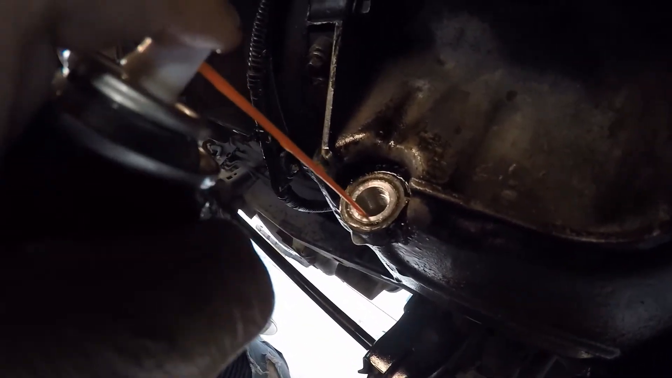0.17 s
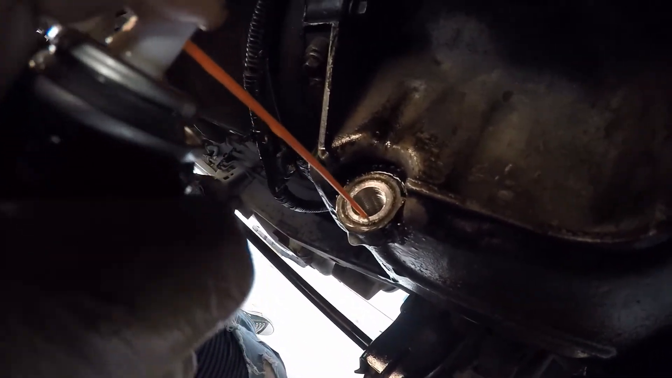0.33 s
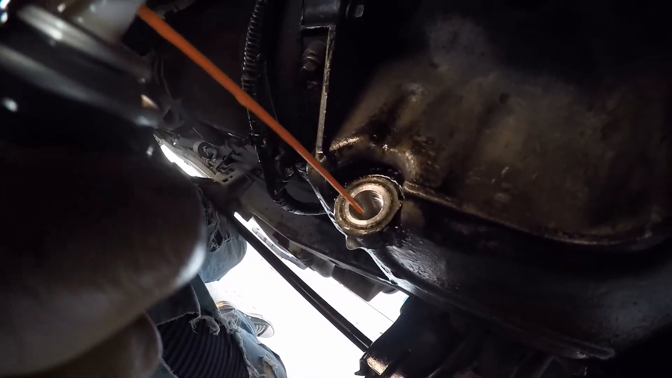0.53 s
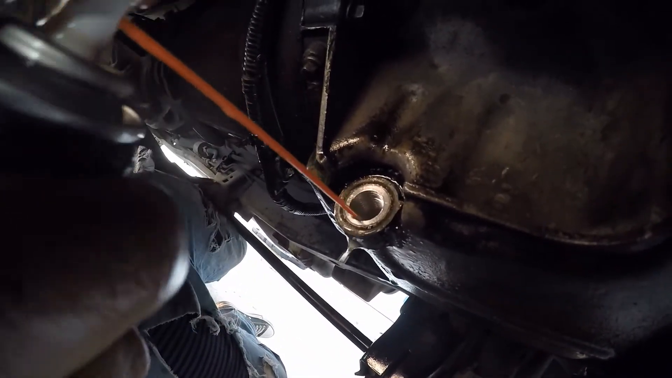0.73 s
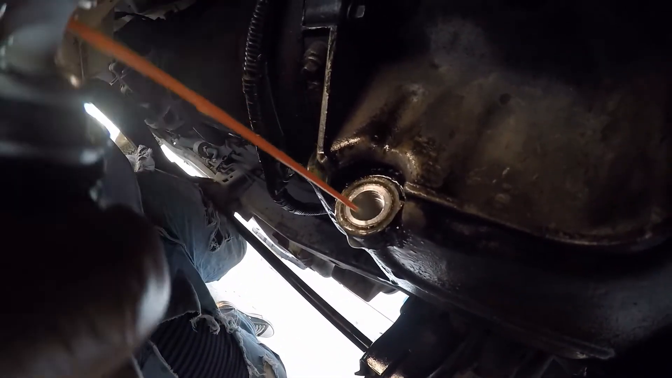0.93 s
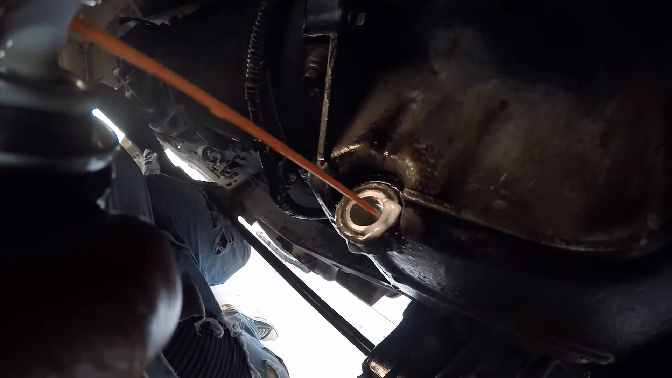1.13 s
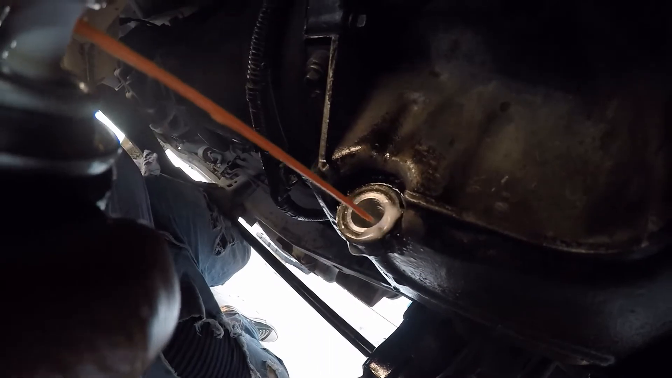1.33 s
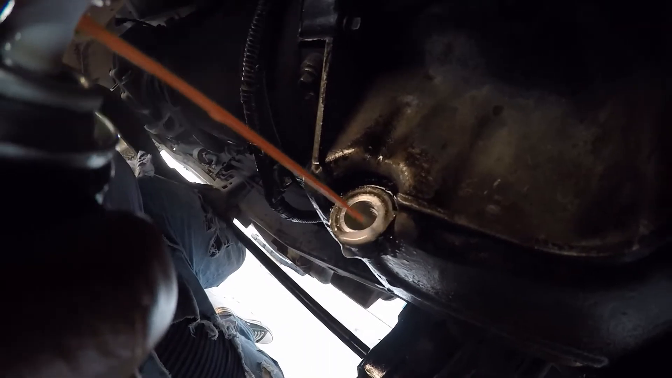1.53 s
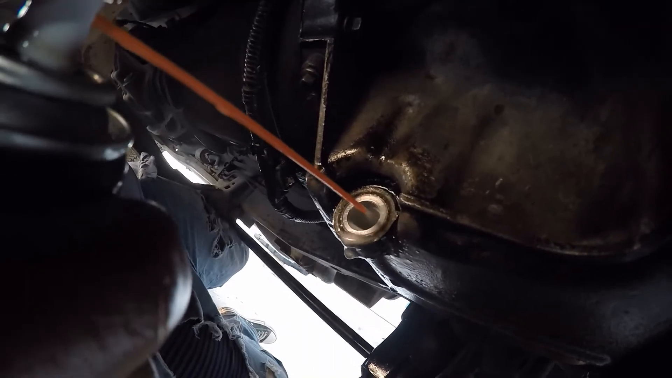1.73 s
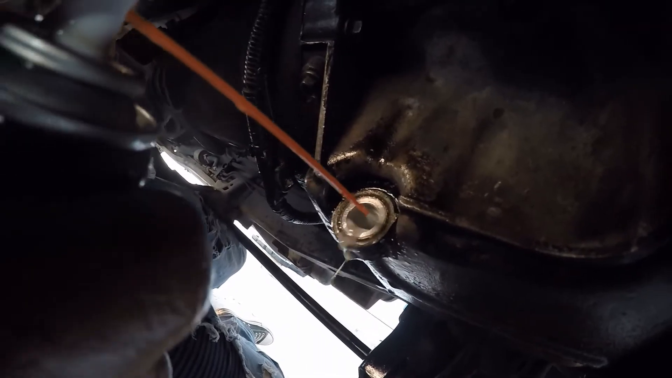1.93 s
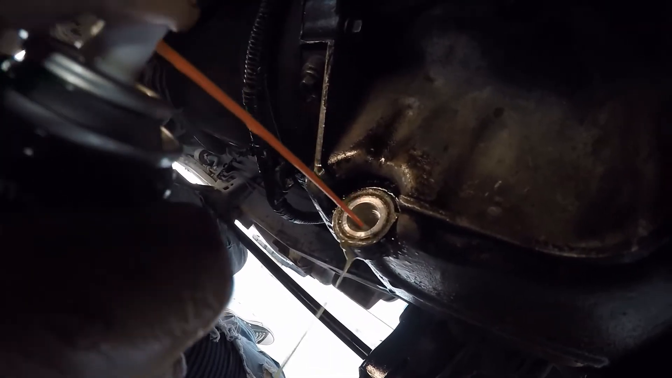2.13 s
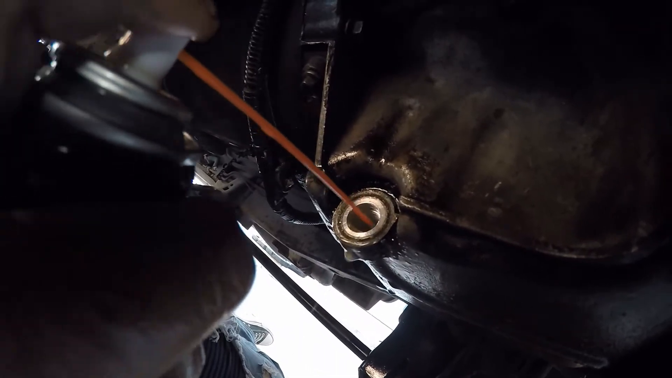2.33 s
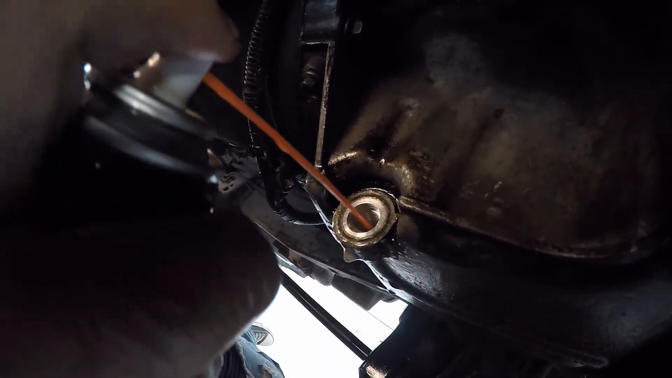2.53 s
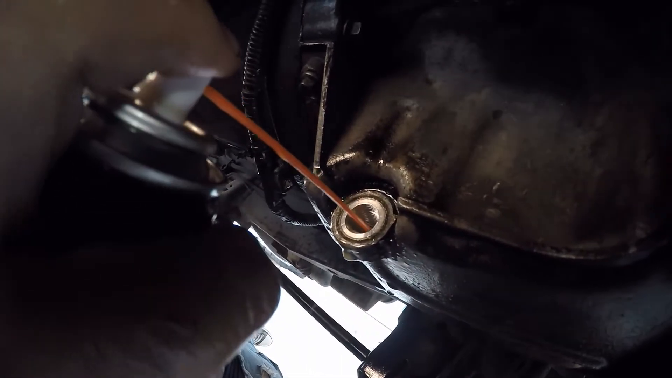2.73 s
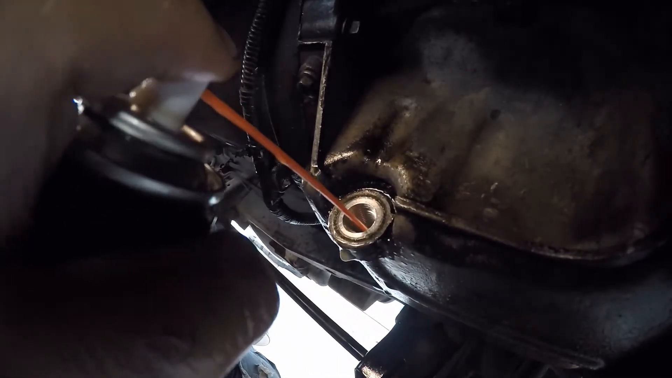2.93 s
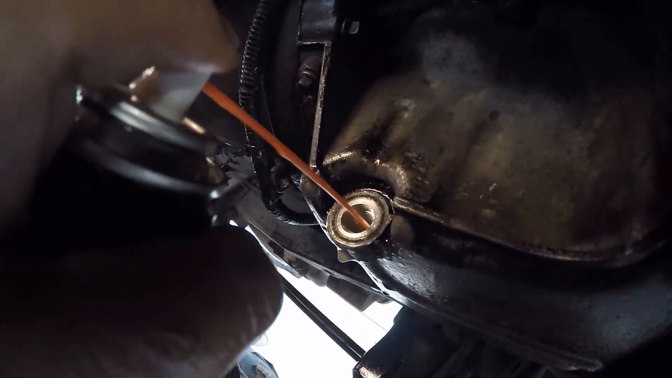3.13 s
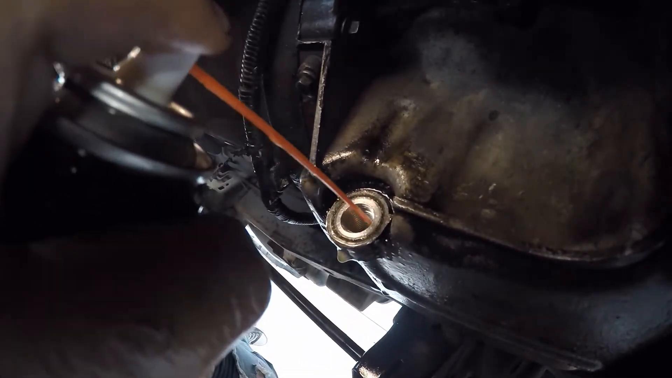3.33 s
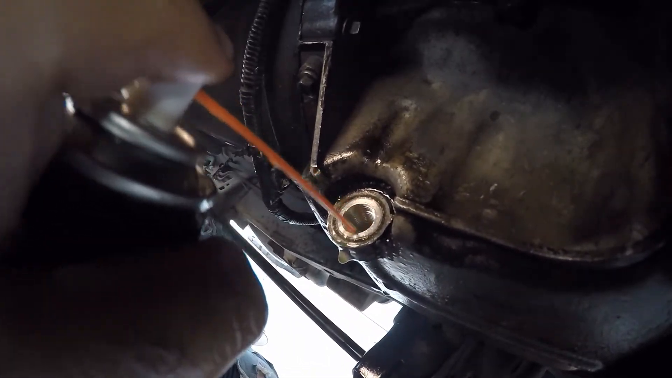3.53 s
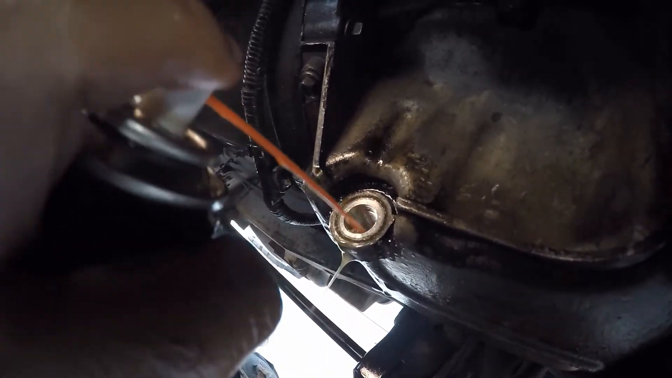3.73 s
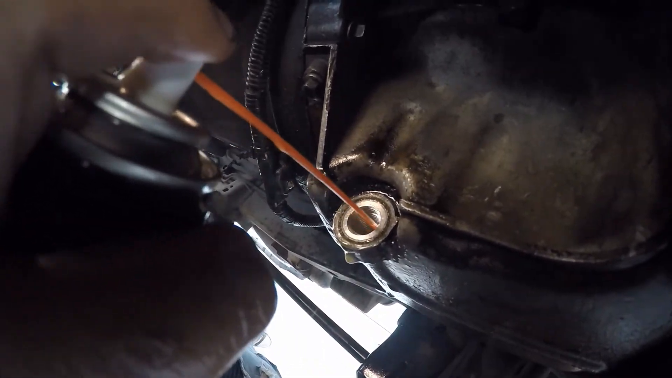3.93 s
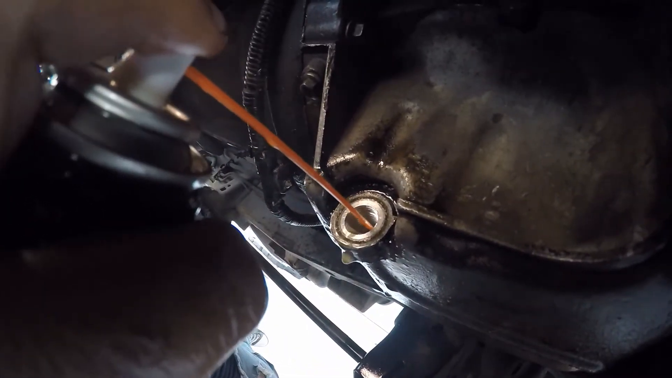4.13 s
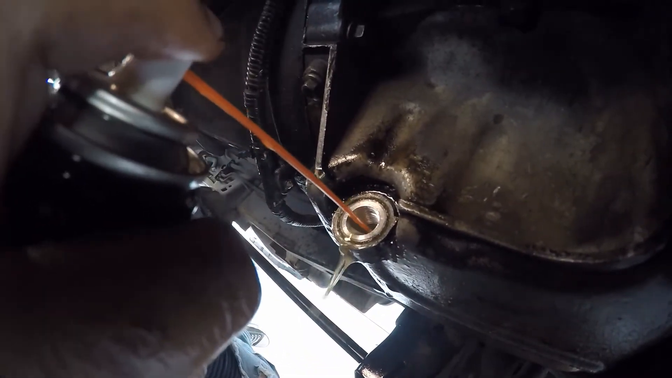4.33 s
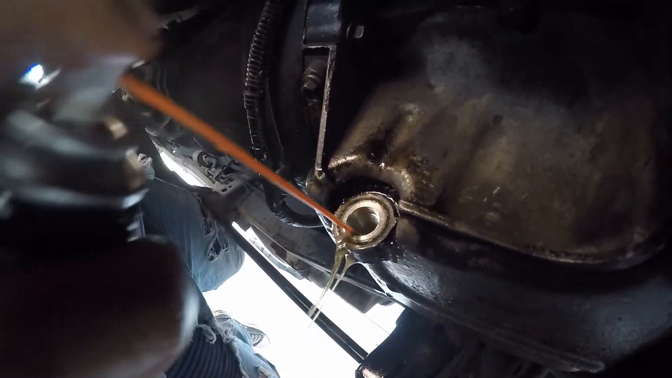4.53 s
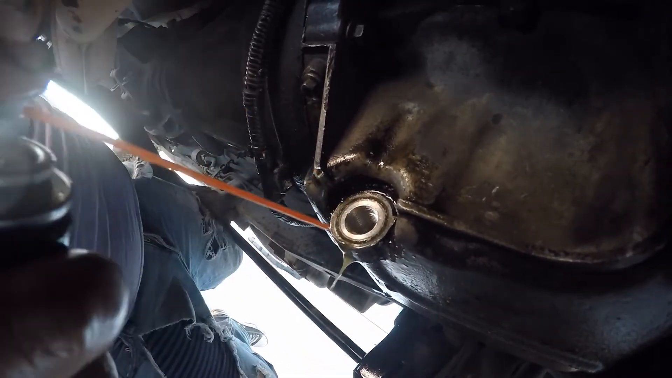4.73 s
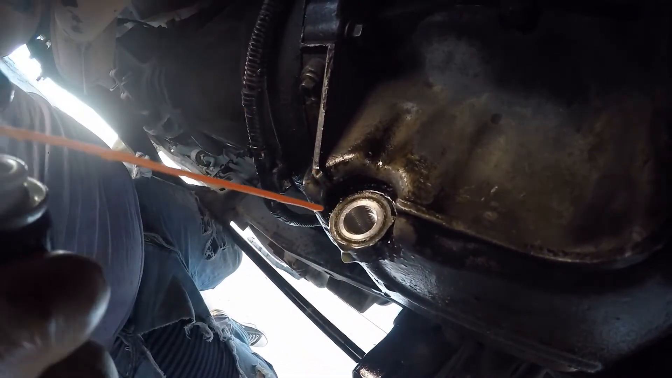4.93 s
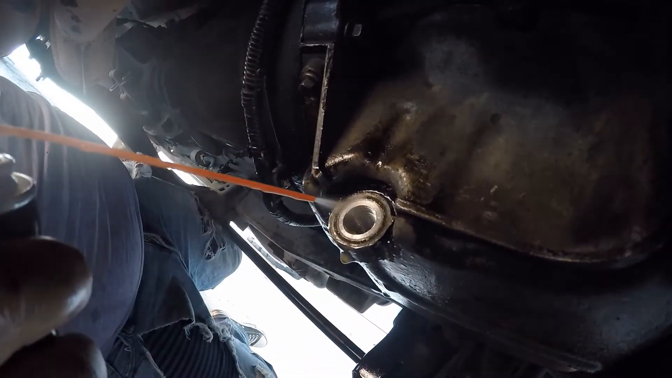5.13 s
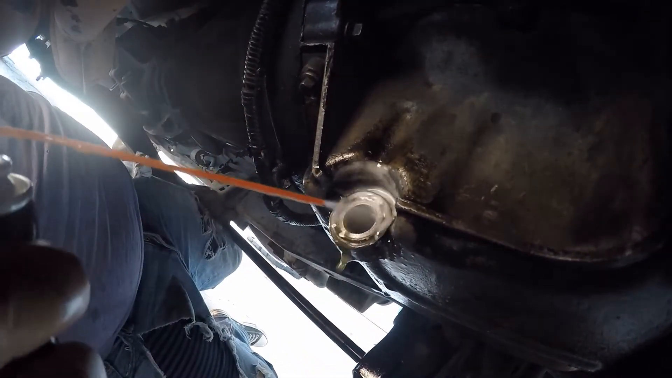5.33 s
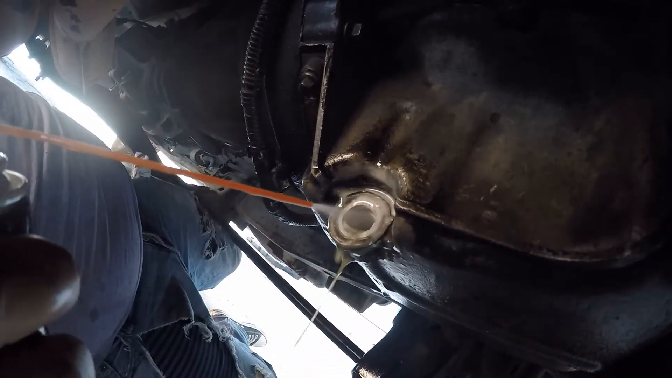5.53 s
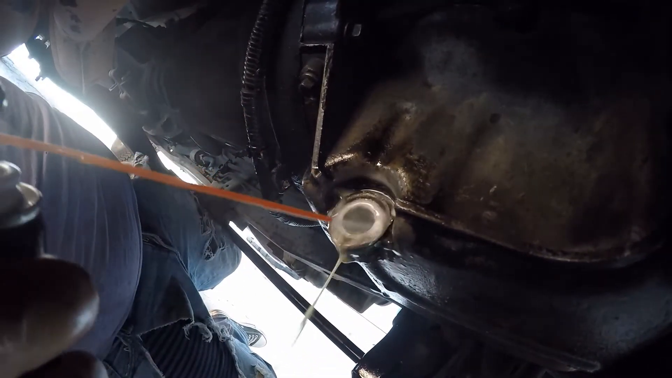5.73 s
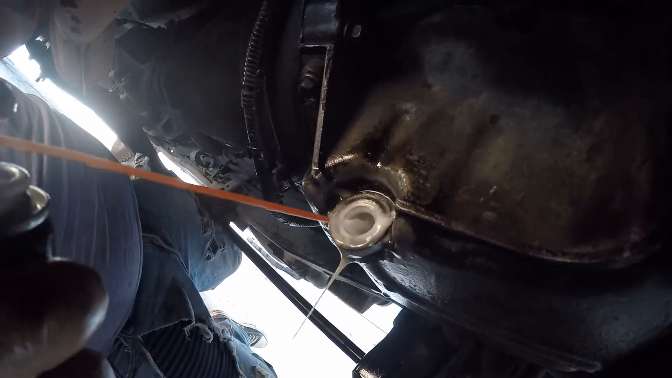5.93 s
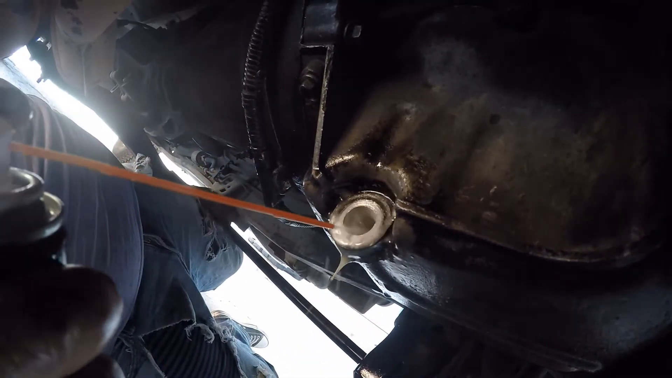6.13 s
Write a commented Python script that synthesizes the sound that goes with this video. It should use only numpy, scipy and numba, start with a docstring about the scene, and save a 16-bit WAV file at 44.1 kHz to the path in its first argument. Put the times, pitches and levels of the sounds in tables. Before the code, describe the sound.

A close microphone catches pressurized gas and liquid blasting into a metal opening, first thin and uneven, then brighter and stronger. The spray breaks off with a few spits, resumes, and halts again amid delicate fizzing. Finally it rushes openly against wet metal, splattering in pulses. Short underbody and garage reflections surround it, with rumble and distant vehicle drones beneath.

```python
"""Aerosol can sprayed into a hole under a car

A jet from a thin straw rings a drain hole near the microphone, falters, stops, then plays on the metal outside.
Filtered noise makes the gas, random impacts make the spattering liquid, and short noise bursts make the spits.
Resonators and echoes give the sound of the underbody and garage.
Behind it lie a low hum made of a sine, noise rumble and buffeting, and distant engines made of a few sines."""
import sys
import numpy as np
from scipy import signal
from scipy.fft import rfft, irfft
from scipy.io import wavfile
from scipy.ndimage import uniform_filter1d
from numba import njit

SR = 44100
rng = np.random.default_rng(int(sys.argv[2]) if len(sys.argv) > 2 else 0)


def store_wav(level_fs):
    """Save 16-bit WAV to argv[1]."""
    pcm = np.round(np.clip(np.atleast_2d(level_fs), -1, 1) * 32767)
    wavfile.write(sys.argv[1], SR, pcm.T.astype(np.int16))


N = 272493
TIME = np.arange(N) / SR  # s
SIZE = 2 ** 19  # filter length in samples, longer than the sound
FREQ = np.maximum(np.arange(SIZE // 2 + 1) * SR / SIZE, 1)  # Hz
WITHDRAW_S = 4.8  # the straw leaves the hole

# Gouts of liquid thrown back onto the metal: start/s, end/s, level/dB before trim and flutter, attack/s, release/s
GOUT_TIMES = [(-.02, .6, -44.5, .02, .08), (.82, 1.03, -44, .04, .03), (1.3, 1.8, -43.5, .3, .05),
              (1.795, 2.2, -29.2, .06, .23), (3.17, 3.48, -41, .15, .06), (3.8, 4.5, -41, .05, .02),
              (5.19, 5.22, -36, .015, .02), (5.31, 5.4, -32, .06, .06), (5.46, 5.79, -27, .11, .06),
              (5.86, 6.14, -26.7, .11, .05)]


def spray_inside():
    """The jet rings the hole, whose resonance shifts with the straw; gas and liquid alternate, so it sputters."""
    # Aim of the straw: t/s, hole ring/dB, hiss/dB, sizzle on the edge/dB (all before trim), hole resonance/Hz
    straw_aim = [(0, -27.7, -29, -35, 4350), (.79, -29.3, -30.5, -33, 4280), (1, -33, -30.7, -27.3, 3800),
                 (1.27, -35.2, -34, -26, 3430), (1.8, -34.2, -31.7, -30.5, 3600),
                 (1.85, -27.5, -25.3, -23.5, 3450), (2.1, -21.3, -24.8, -28.5, 2780),
                 (2.44, -18, -25, -35, 3650), (2.65, -21.2, -23.7, -26, 4250), (3.1, -22, -22.2, -28, 4320),
                 (3.22, -19.3, -18.7, -20.5, 4450), (3.29, -17.6, -23.8, -22, 4480),
                 (3.96, -18, -24.7, -27.5, 4280), (4.2, -18.3, -26.3, -33, 4130),
                 (4.5, -17.7, -23.3, -31, 4200)]
    # Spectrum of the noise that rings the hole: f/Hz, level/dB
    hole_spectrum = [(500, -35), (1700, -9.5), (2150, -7), (2600, 4.5), (3300, 2.5), (4500, -0.5),
                     (5700, -3), (6500, -8.5), (9000, -38)]
    # Spectrum of the gas hissing in the hole: f/Hz, level/dB
    hiss_spectrum = [(300, -16), (2000, -18.5), (6000, -8.5), (8000, -3.5), (9500, -2), (11000, 3.5),
                     (13000, 0.5), (15300, -5.5)]
    edge_spectrum = [(4500, -38), (6300, 0.5), (7600, 1.5), (8600, -0.5), (11000, -28)]  # f/Hz, level/dB
    steady_wet_db = -48  # spatter between the gouts, before trim

    ring_db, hiss_db, edge_db, hole_hz = curves(straw_aim)
    sputter = undb(0.64 * walk(700) + 0.59 * walk(60))
    ringing = unit(sweep(shape(noise(), hole_spectrum), hole_hz, 2480.0))
    hole = ringing * undb(ring_db - 0.17)
    hiss = shape(noise(), hiss_spectrum) * undb(hiss_db - 0.57 + 0.32 * walk(49))
    edge = shape(noise(), edge_spectrum) * undb(edge_db - 4.0)
    wetness = np.hypot(undb(steady_wet_db), swells(GOUT_TIMES))
    liquid = splash(gain_db=0.65, flutter_db=1.2) * wetness
    jet = (hole + hiss + edge) * sputter + liquid
    return cupped(jet * flow() * (TIME < WITHDRAW_S))


def spray_outside():
    """The wet straw clears, then the free jet rushes where it grazes the rim and splashes harder."""
    # Spectrum of the free jet's hiss: f/Hz, level/dB
    jet_spectrum = [(300, -12.5), (1500, -24.5), (2200, -13), (3800, -13), (5300, -8), (6300, -7.5),
                    (8500, -4), (10900, 1.5), (12800, -2.5), (14000, -4), (15300, -11.5)]
    # The jet wanders over the rim: t/s, rim resonance/Hz
    rim_path = [(5.2, 4500), (5.35, 4600), (5.47, 4070), (5.7, 4000), (5.88, 3580), (6.1, 4150)]
    # The jet catches the rim: start/s, end/s, level/dB before trim, attack/s, release/s
    graze_times = [(5.205, 5.222, -26, .01, .012), (5.3, 5.362, -20.5, .04, .02),
                   (5.4, 5.5, -25.5, .02, .05), (5.7, 5.885, -24.5, .08, .04), (6.04, 6.14, -27, .04, .03)]
    # Gas clears the wet straw before the jet opens fully: t/s, level/dB
    clearing_levels = [(5.05, -64), (5.09, -44.5), (5.15, -36.5), (5.21, -44), (5.3, -45)]
    clearing_spectrum = [(1000, -25), (1700, -8), (2250, -3), (2800, -2),
                         (3700, -20), (5600, -11), (7300, -6), (10000, -23)]  # f/Hz, level/dB
    hiss_db = -19.4
    steady_rim_db, steady_wet_db = -25.7, -42  # between grazes and between gouts, before trim

    rim_hz, = curves(rim_path)
    clearing_db, = curves(clearing_levels)
    sputter = undb(.8 * walk(600) + 0.46 * walk(50))
    hiss = shape(noise(), jet_spectrum) * undb(hiss_db)
    # two passes make the band steeper
    rush = unit(sweep(sweep(noise(), rim_hz, 2100.0), rim_hz, 2100.0))
    rim = rush * np.hypot(undb(steady_rim_db), swells(graze_times)) * undb(-1.35)
    wetness = np.hypot(undb(steady_wet_db), swells(GOUT_TIMES))
    liquid = splash(gain_db=-0.94, flutter_db=1.2) * wetness
    jet = ((hiss + rim) * sputter + liquid) * flow() * (TIME >= WITHDRAW_S)
    clearing = shape(noise(), clearing_spectrum) * undb(clearing_db) * during(clearing_levels)
    return jet + clearing * sputter


def flow():
    """Loudness of the spray as the valve opens and shuts: each press starts louder, then settles."""
    # Finger on the valve: start/s, end/s, settled level/dB relative to fully open, attack/s, release/s
    valve_presses = [(-1, 3.522, 0, .01, .024), (3.575, 3.6, -21, .01, .008), (3.7, 3.8, -18, .04, .02),
                     (3.7, 3.905, -12.5, .17, .02), (3.89, 4.51, 0, .056, .0065),
                     (5.04, 5.19, -18, .125, .01), (5.17, 6.2, 0, .046, .01)]
    overshoot_db, settle_s = 4.2, .11  # louder start of a full press, and how fast it settles
    overshoot = 0
    for start, _, db, _, _ in valve_presses:
        # fainter presses overshoot less
        overshoot = overshoot + undb(db) * (TIME >= start) * np.exp(-np.abs(TIME - start) / settle_s)
    return swells(valve_presses) * undb(overshoot_db * overshoot)


def splash(gain_db, flutter_db):
    """Liquid drums on the wet metal: a crowd of uneven impacts whose level flutters."""
    # Spectrum of the splashing: f/Hz, level/dB
    splash_spectrum = [(120, 3), (280, -6.5), (500, -1.5), (1000, 2.5), (1700, -5), (2400, -4),
                       (3500, -7.5), (8000, -34)]
    impacts = unit(droplets(rate=2500, spread_db=2.5) + 0.56 * noise())
    return shape(impacts, splash_spectrum) * undb(gain_db + flutter_db * walk(35))


def droplets(rate, spread_db):
    """Random impacts, on average rate per second, of uneven size; rms 1."""
    size = undb(spread_db * np.minimum(rng.exponential(size=N), 5))
    hits = rng.random(N) < rate / SR
    return unit(hits * size * np.sign(noise()))


def spits():
    """With the valve shut, the liquid still in the straw pops and fizzes."""
    # Spits of liquid: t/s, peak/dB, centre/Hz, width/octaves, time to fall by 60 dB/s
    spit_list = [(3.655, -36, 4500, 1.8, .03), (3.698, -36, 4500, 1.6, 0.031),
                 (3.719, -28, 4500, 1.2, 0.049), (4.575, -31, 3600, .65, 0.024),
                 (4.640, -44, 6850, 0.21, 0.018), (4.655, -31, 12100, .4, 0.027),
                 (4.671, -48.5, 9400, .08, .04), (4.85, -41, 11500, .5, 0.046),
                 (4.864, -43, 10800, .2, .03), (4.877, -44, 9300, .15, .04), (4.897, -43, 7450, .15, 0.035),
                 (4.934, -48, 7400, .12, .04), (5.044, -40.5, 7000, .7, .06)]
    # Liquid fizzing at the straw's tip: t/s, level/dB
    fizz_levels = [(4.66, -73), (4.73, -60.5), (4.85, -56.5), (4.92, -59.5), (4.98, -55), (5.03, -64),
                   (5.15, -75)]
    fizz_db, = curves(fizz_levels)
    foam = unit(droplets(rate=1500, spread_db=3.0) + .5 * noise())
    fizz = shape(foam, [(2000, -24), (6000, -9), (11200, 0), (15000, -5.5)])
    out = fizz * undb(fizz_db) * during(fizz_levels)
    t = TIME[:4096]
    octave = np.log2(np.maximum(np.fft.rfftfreq(len(t), 1 / SR), 1))
    for s, db, hz, width, t60 in spit_list:
        band = np.exp(-.5 * ((octave - np.log2(hz)) / width) ** 2)
        burst = irfft(rfft(rng.standard_normal(len(t))) * band)
        pop = burst * np.exp(-np.log(1000) * t / t60) * (1 - np.exp(-t / 0.00071))
        start = int(s * SR)
        out[start:start + len(t)] += undb(db) * pop / np.abs(pop).max()
    return out


def cupped(x):
    """Hand and can close in on the open hole and form a pocket that rings."""
    # How closely hand and can cup the hole: t/s, closeness/0-1
    cup_closeness = [(0, 0.7), (.7, 0.42), (1.0, 0.82), (1.7, 0.55), (2.0, 0.7), (2.35, 0.48), (2.7, 1),
                     (4.5, 0.93)]
    # Resonances (+) and cancellations (-) of the pocket between hole, can and hand: f/Hz, width/Hz, gain/dB
    pocket_modes = [(3020, 87, -19), (3320, 130, -5), (3515, 78, -0.5), (3810, 60, -11.5), (3950, 160, 5.5),
                    (4555, 94, 8.5), (4940, 230, 0.5), (5500, 290, 4), (5940, 130, 0.5), (6000, 90, -6.5),
                    (6630, 230, -12.5), (7260, 82, 5.5), (7700, 86, -17), (7980, 120, 3.5), (8170, 90, 0),
                    (8380, 80, -10), (8930, 220, 9), (9500, 110, -7), (9570, 120, 15.5), (10170, 90, 5),
                    (10460, 220, 7.5), (10900, 90, -2), (10830, 120, 1.5), (11800, 90, -1), (12000, 160, 0),
                    (12260, 110, -1), (12580, 200, 6), (13250, 130, -5), (13640, 150, 5.5)]
    # Bounces off the sump round the open hole: lag/s, gain/ratio
    sump_bounces = [(.000276, 0.082), (.000477, .17), (.00059, -0.24), (.000996, -.24), (.001523, 0.12),
                    (.001665, -0.23), (.00278, .17)]
    # Resonances (+) and cancellations (-) of the open hole: f/Hz, width/Hz, gain/dB
    open_modes = [(2820, 100, -8), (4230, 210, 2), (4680, 300, -4), (5500, 200, 7.5), (6900, 200, -1.5),
                  (10300, 270, 0)]
    close = np.clip(curves(cup_closeness)[0], 0, 1)
    uncovered = resonate(reflect(x, sump_bounces), open_modes) * undb(-1)
    return close * resonate(x, pocket_modes) + (1 - close) * uncovered


def drifting(x, count=10):
    """The moving arm and can reflect only short waves; their paths wander, so fine ripples slide through the hiss."""
    high_pass = signal.butter(2, 2600, "high", fs=SR, output="sos")
    treble = signal.sosfiltfilt(high_pass, x)
    lags = rng.uniform(0.000975, .006, count)  # s
    # alternate signs, each lag wandering slowly
    paths = [(lag + .00004 * walk(1.524), .11 * (-1) ** k) for k, lag in enumerate(lags)]
    return x - treble + reflect(treble, paths)


def reflect(x, paths):
    """The sound plus delayed copies of it, one for each (lag/s, gain); lags may move."""
    fine = signal.resample_poly(x, 2, 1)  # finer steps to read between samples
    fine_time = np.arange(2 * N) / (2 * SR)
    return x + sum(gain * np.interp(TIME - lag, fine_time, fine) for lag, gain in paths)


def echoes(x, t60, gap, db):
    """A dense train of reflections that starts after gap and falls by 60 dB in t60 (both in s)."""
    t = TIME[:SR // 2]
    response = rng.standard_normal(len(t)) * np.exp(-np.log(1000) * t / t60) * (t > gap)
    return undb(db) * signal.fftconvolve(x, response / np.linalg.norm(response))[:N]


def background():
    """Traffic rumble, buffeting air, a wavering hum and one distant engine whose speed drifts."""
    # Spectrum of the traffic rumble: f/Hz, level/dB
    rumble_spectrum = [(20, -25.5), (45, -1), (65, 10), (82, -2), (105, -4.5), (130, -6), (165, -14),
                       (200, -20), (260, -24), (500, -28.5), (1000, -35.5), (2000, -40.5), (5000, -49),
                       (15000, -59)]
    # The rumble's level rises and dips: t/s, level/dB
    rumble_levels = [(0, -29.5), (.95, -23), (1.5, -28.5), (3.1, -30.5), (3.5, -34), (3.9, -27.5),
                     (4.4, -36), (4.75, -36), (5.1, -28), (6.18, -26)]
    # Air buffeting the microphone: t/s, level/dB
    buffet_levels = [(0, -21), (.25, -14), (.7, -24), (1.2, -13), (2.6, -20), (3.2, -18), (3.7, -20),
                     (4.7, -25), (6.18, -17.5)]
    # Mains hum: t/s, level/dB before it wavers
    hum_levels = [(0, -37.5), (1, -40.5), (2, -46), (3.5, -34.5), (4.5, -36.5), (4.9, -26.5), (6.18, -28)]
    # Distant engine: t/s, firing rate/Hz before jitter, level/dB before trim, third harmonic/dB against the second
    engine_course = [(0, 60, -50, -14), (.5, 60.7, -42, -24), (1.8, 62, -41.5, -6), (2.8, 63.2, -41, -4),
                     (3.9, 65.2, -39.5, -10), (4.55, 63.4, -48, -13), (4.75, 61.5, -36, -22),
                     (5.4, 68.5, -33, -22), (5.8, 68, -49, -12)]
    buffet_spectrum = [(4, -15), (13, 7.5), (17, -5.5), (24, -7), (45, -18.5), (100, -32.5), (400, -82)]  # f/Hz, dB
    hum_hz = 59.3

    rumble_db, = curves(rumble_levels)
    buffet_db, = curves(buffet_levels)
    hum_db, = curves(hum_levels)
    firing_hz, engine_db, third_db = curves(engine_course)
    rumble = shape(noise(), rumble_spectrum) * undb(rumble_db)
    buffet = shape(noise(), buffet_spectrum) * undb(buffet_db)
    hum_wave = unit(np.sin(2 * np.pi * hum_hz * TIME + 0.17 * walk(1.7)))
    hum = hum_wave * undb(hum_db + 1.8 * walk(7.4))
    phase = 2 * np.pi * np.cumsum(firing_hz * (1 + 0.008 * walk(13))) / SR
    engine = 0
    for harmonic, db in enumerate([-2, 0, third_db, -21], start=1):
        engine = engine + undb(db + 2.8 * walk(11)) * np.sin(harmonic * phase)
    return rumble + buffet + hum + engine * undb(engine_db + 2)


def street():
    """Far vehicles, each two sines at gliding pitch, drone in and out over an even wash of noise."""
    # Far vehicles: start/s, end/s, firing rate at start/Hz, at end/Hz (both before jitter),
    # peak level/dB before it wavers, tone at one and a half times the firing rate/dB relative
    vehicle_list = [(2.45, 3.6, 79, 99, -34, -6), (3.5, 4.3, 100, 113, -40, -2),
                    (5.55, 6.25, 110, 82, -33, -14)]
    wash_db = -61
    out = shape(noise(), [(100, -10), (350, 0), (900, -2), (2500, -15), (8000, -35)]) * undb(wash_db)
    for start, end, from_hz, to_hz, db, half_db in vehicle_list:
        along = np.clip((TIME - start) / (end - start), 0, 1)
        firing_hz = (from_hz + (to_hz - from_hz) * along) * (1 + .01 * walk(13))
        phase = 2 * np.pi * np.cumsum(firing_hz) / SR
        drone = np.sin(phase) + undb(half_db) * np.sin(3 * phase / 2)
        # the root of 2 brings the main sine to rms 1
        out += drone * np.sin(np.pi * along) * undb(db + 2 * walk(11)) * np.sqrt(2)
    return out


def undb(db):
    """Decibels to gain."""
    return 10 ** (np.asarray(db) / 20)


def unit(x):
    """Scale to rms 1."""
    return x / np.sqrt(np.mean(x ** 2))


def curves(table):
    """Each column of a timed table, drawn as straight lines sample by sample."""
    s, *columns = np.transpose(table)
    return [np.interp(TIME, s, c) for c in columns]


def during(table):
    """1 while a timed table lasts, with soft edges."""
    inside = (TIME >= table[0][0]) & (TIME <= table[-1][0])
    return uniform_filter1d(1. * inside, size=400)


def swells(table):
    """Events that rise, hold and die away; the strongest prevails."""
    events = []
    for start, end, db, attack, release in table:
        rise = np.sin(np.pi / 2 * np.clip((TIME - start) / attack, 0, 1)) ** 2
        fall = np.exp(-np.maximum(TIME - end, 0) / release)
        events.append(undb(db) * rise * fall)
    return np.max(events, axis=0)


def noise():
    """White noise, the raw sound of turbulence."""
    return rng.standard_normal(N)


def walk(rate):
    """Smooth random wander with about rate new targets a second, spread near 1."""
    k = max(int(SR / rate), 1)
    steps = rng.standard_normal(N)[np.arange(N) // k]
    return 1.16 * uniform_filter1d(steps, k)


def shape(x, points):
    """Filter by a spectrum of (f/Hz, level/dB) points; rms 1."""
    hz, db = np.transpose(points)
    gain = undb(np.interp(np.log(FREQ), np.log(hz), db))
    return unit(irfft(rfft(x, SIZE) * gain)[:N])


def resonate(x, modes):
    """A chain of peaking and notching resonators, each (f/Hz, width/Hz, gain/dB)."""
    sections = []
    for hz, width, db in modes:
        w, a = 2 * np.pi * hz / SR, undb(db / 2)
        damp = np.pi * abs(width) / SR
        top = [1 + damp * a, -2 * np.cos(w), 1 - damp * a]
        bottom = [1 + damp / a, -2 * np.cos(w), 1 - damp / a]
        sections.append(np.array(top + bottom) / bottom[0])
    return signal.sosfilt(sections, x)


@njit
def sweep(x, hz, width):
    """Band-pass with a moving centre: two linked stores, one for the band and one for the lows."""
    y, band, low = np.empty(len(x)), 0., 0.
    for i in range(len(x)):
        g, k = np.tan(np.pi * hz[i] / SR), width / hz[i]
        v = (band + g * (x[i] - low)) / (1 + g * (g + k))
        band, low, y[i] = 2 * v - band, low + 2 * g * v, k * v
    return y


def scene():
    """The sprays bounce off the arm and nearby panels, then faintly around the garage."""
    # Resonances (+) and cancellations (-) of the space under the car: f/Hz, width/Hz, gain/dB
    underbody_modes = [(418, 58, 6.5), (660, 126, -9.5), (894, 144, 6.5), (1227, 90, -7), (1340, 130, 8.5),
                       (1450, 40, -9), (1590, 100, 5), (1700, 93, -5), (2118, 300, 6.5), (2810, 120, 0.5),
                       (2883, 63, -7)]
    spray = drifting(spray_inside() + spray_outside())
    near = resonate(spray, underbody_modes) * undb(-.3) + spits()
    panels = echoes(near, t60=0.061, gap=.005, db=-14.5)
    garage = echoes(near, t60=.3, gap=0.013, db=-30)
    return np.tile(near + panels + garage + background() + street(), (2, 1))


def record(dry):
    """The left microphone port passes less bass than the right; the top is cut steeply."""
    left_port_hz, top_hz = 77, 15250
    left = signal.sosfilt(signal.butter(1, left_port_hz, "high", fs=SR, output="sos"), dry[0])
    top = signal.ellip(12, .1, 80, top_hz, fs=SR, output="sos")
    return signal.sosfilt(top, np.array([left, dry[1]]))


dry = scene()
out = record(dry)
store_wav(out)
```